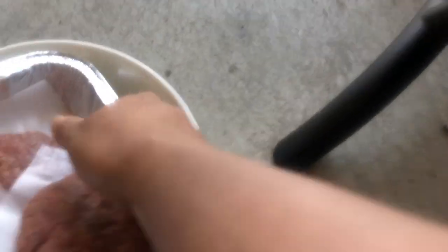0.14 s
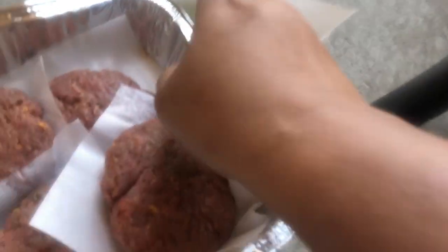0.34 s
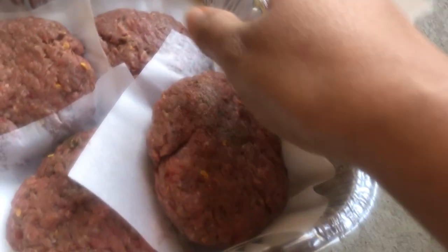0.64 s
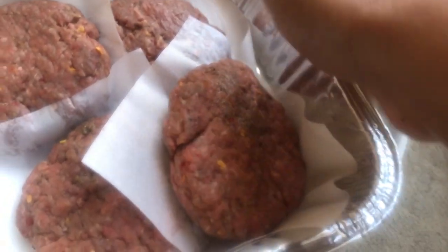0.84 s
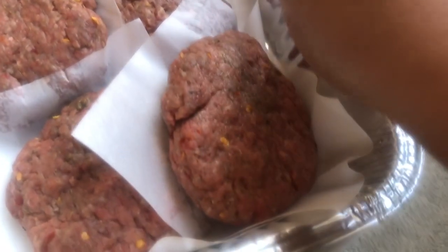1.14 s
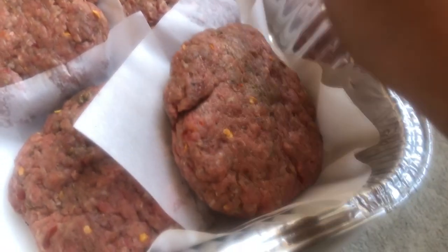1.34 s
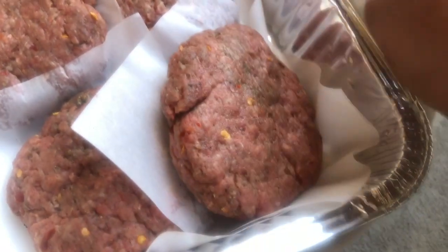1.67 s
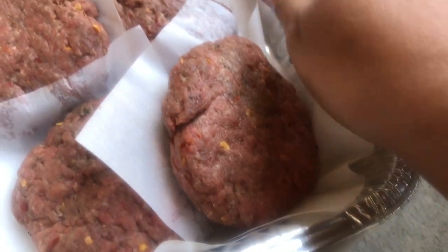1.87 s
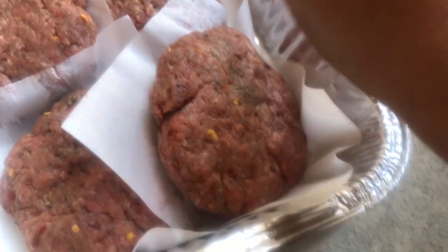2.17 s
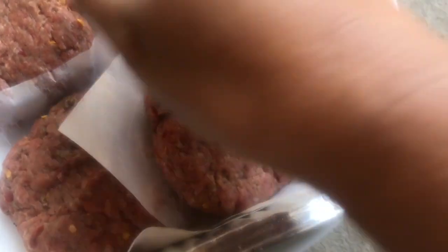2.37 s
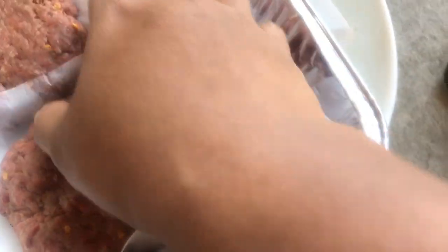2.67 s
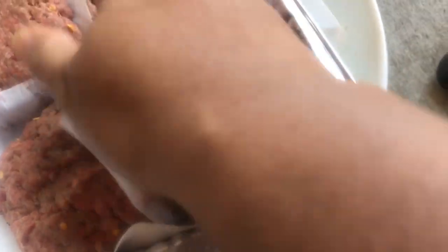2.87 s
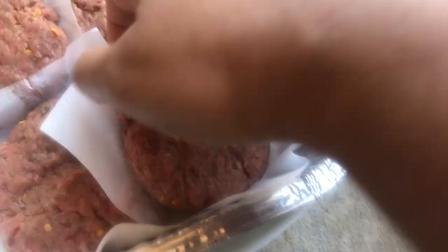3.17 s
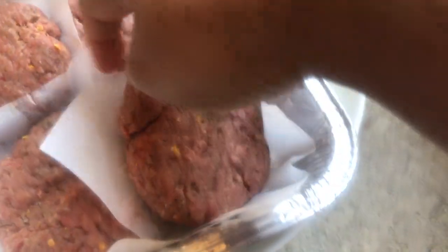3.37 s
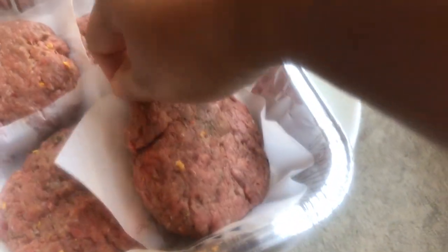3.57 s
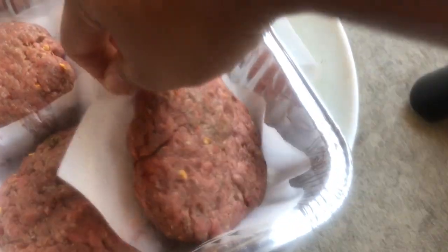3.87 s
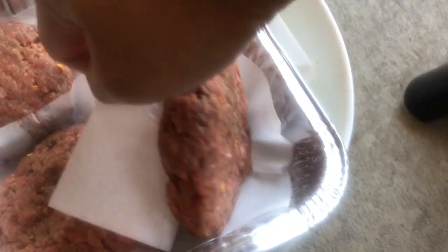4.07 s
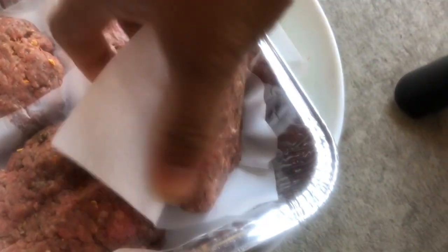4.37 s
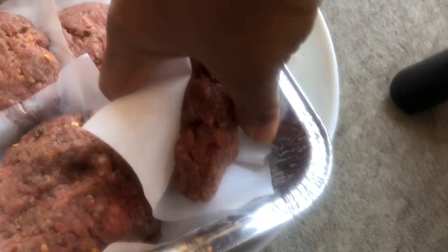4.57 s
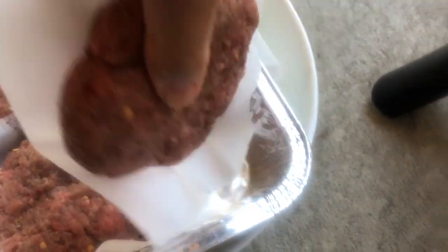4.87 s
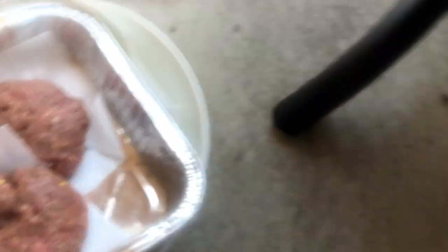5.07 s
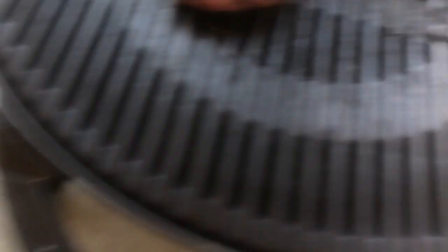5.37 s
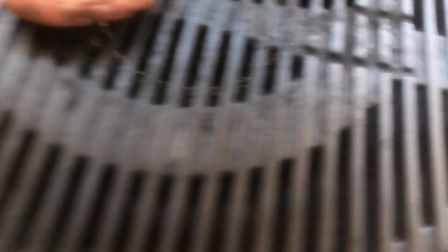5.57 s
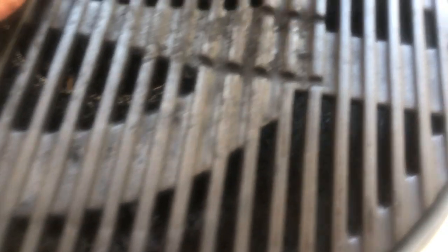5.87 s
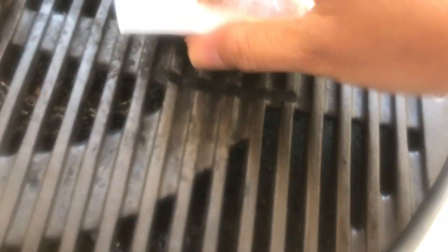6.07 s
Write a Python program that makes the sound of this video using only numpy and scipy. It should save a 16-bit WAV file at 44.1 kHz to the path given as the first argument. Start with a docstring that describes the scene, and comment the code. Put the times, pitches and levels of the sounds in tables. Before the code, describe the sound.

Meat sizzles on a grill while a foil tray and paper sheets are handled close by, crinkling, scraping and knocking.

```python
"""Outdoors at a grill, a hand-held phone microphone close beside the patties.
Steam bubbles burst in the fat: a sizzle heard from the side, then louder as the phone turns
to the grate, where single drops spit. Nearby a foil tray scrapes, rings and knocks as it is
shifted, and paper sheets rustle and snap. Near the end, water flashing to steam makes the fat
sputter in one burst. A low, distant rumble lies under it all."""
import sys
import numpy as np
from scipy import signal
from scipy.fft import rfft, irfft
from scipy.io import wavfile
from scipy.ndimage import uniform_filter1d

SR = 44100
rng = np.random.default_rng(int(sys.argv[2]) if len(sys.argv) > 2 else 0)


def unload_wav(signal):
    """Save mono or channel-first audio to the path in sys.argv[1] as 16-bit WAV at rate SR, clipped to [-1, 1]."""
    wavfile.write(
        sys.argv[1],
        SR,
        np.round(np.clip(np.atleast_2d(signal).T, -1, 1) * 32767).astype(np.int16),
    )


N = 274434
T = np.arange(N) / SR


def undb(db):
    """Gain of a level in dB."""
    return 10 ** (np.asarray(db) / 20)


def unit(x):
    """Scale to rms 1."""
    return x / np.sqrt(np.mean(x ** 2))


def gain(time_s, level_db):
    """Gain along a level curve, silent outside it."""
    return undb(np.interp(T, time_s, level_db, left=-120, right=-120))


def colour(x, spectrum):
    """Shape x to a (freq_hz, gain_db) spectrum, at rms 1."""
    freq_hz, gain_db = np.transpose(spectrum)
    bins_hz = np.fft.rfftfreq(2048, 1 / SR)
    curve_db = np.interp(np.log(bins_hz + 1), np.log(freq_hz), gain_db)
    cepstrum = irfft(curve_db * np.log(10) / 20)
    cepstrum[1:1024] *= 2  # folding the cepstrum makes the filter causal
    cepstrum[1025:] = 0
    impulse = irfft(np.exp(rfft(cepstrum)))
    return unit(signal.fftconvolve(x, impulse)[:N])


def band(x, hz, octaves):
    """Band-pass around hz."""
    edges = np.clip(hz * 2 ** np.array([-octaves / 2, octaves / 2]), [50, 100], [SR / 2.4, SR / 2.2])
    return signal.sosfilt(signal.butter(2, edges, "bandpass", fs=SR, output="sos"), x)


def low_shelf(x, hz, gain_db):
    """Raise or lower the part of x below hz."""
    low = signal.sosfiltfilt(signal.butter(2, hz, fs=SR, output="sos"), x)
    return x + (undb(gain_db) - 1) * low


def walk(rate_hz):
    """Smooth random drift at rms 1."""
    hold = int(SR / rate_hz)
    steps = np.repeat(rng.standard_normal(N // hold + 1), hold)
    return unit(uniform_filter1d(uniform_filter1d(steps, hold), hold)[:N])


def grains(per_s, spread_db):
    """Random clicks of either sign; a few are much larger than the rest."""
    clicks = (rng.random(N) < per_s / SR) * rng.standard_normal(N)
    return clicks * undb(spread_db * np.minimum(rng.exponential(size=N), 5))


def pitched_pops(per_band_s, spread_db, octaves):
    """Each size of bubble or crease rings briefly at its own pitch."""
    pitches_hz = 1000 * 2 ** np.arange(0, 4.1, .25)
    return unit(sum(unit(band(grains(per_band_s, spread_db), hz, octaves)) * np.sqrt(hz)
                    for hz in pitches_hz))


def burst(t60_s, rise_s=0.00028, crack_db=-40.):
    """Decaying noise with a quick rise, optionally led by a much shorter crack."""
    t = T[:4096]
    fall = np.exp(-np.log(1000) * t / max(t60_s, .002)) + undb(crack_db) * np.exp(-t / 0.00021)
    return rng.standard_normal(len(t)) * (1 - np.exp(-t / rise_s)) * fall


def add(out, start_s, sound, peak_db):
    """Mix a short sound in at the given peak level."""
    i = int(start_s * SR)
    out[i:i + len(sound)] += (sound * undb(peak_db) / np.abs(sound).max())[:N - i]


# Spectrum of the rumble, far from the microphone: freq_hz, gain_db
RUMBLE_COLOUR = [(15, -41), (25, -13.5), (103, -1), (134, -3.5), (179, -1), (365, -9), (389, -20),
                 (500, -10), (650, -40.5), (1100, -120)]
# Spectrum of the steady background around the grill: freq_hz, gain_db
AIR_COLOUR = [(200, -19.5), (400, 1), (700, -2.5), (1200, 0), (1700, -9), (2050, -6.5), (2600, -5),
              (2980, -18), (3300, -4), (4500, -6), (7000, -14)]


def outdoors():
    """Distant low noise wavers slightly under a steady mid-range background."""
    rumble_db = -56.5 + walk(8) + 0.16 * walk(1.14)
    rumble = undb(rumble_db) * colour(rng.standard_normal(N), RUMBLE_COLOUR)
    air = undb(-54.5) * colour(rng.standard_normal(N), AIR_COLOUR)
    return rumble + air


# Modes of the foil tray: pitch_hz, gain_db, t60_s
TRAY_MODES = [(290, -14, 0.039), (413, -5, 0.036), (563, 2.5, 0.024), (729, 2, 0.016), (999, 5.5, 0.016),
              (1224, 6.5, 0.0086), (1630, 3, 0.013), (2107, 5.5, 0.0037), (3470, -4, 0.012)]


def tray_ring(force, uneven_db=0.):
    """The tray's modes ring, alternating in sign; a moving contact point feeds them unevenly."""
    out = 0
    for k, (pitch_hz, gain_db, t60_s) in enumerate(TRAY_MODES):
        r = np.exp(-np.log(1000) / (t60_s * SR))
        w = 2 * np.pi * pitch_hz / SR
        feed = force * undb(uneven_db * walk(29.855)) if uneven_db else force
        mode = signal.lfilter([np.sin(w)], [1, -2 * r * np.cos(w), r * r], feed)
        out += (-1) ** k * undb(gain_db) * mode
    return out


# The hand in the tray near the microphone, one list per movement: time_s, tray_db, paper_db
HAND_MOVES = [
    [(0, -34.5, -34), (.036, -36, -35), (.075, -41.5, -28.5), (.114, -42, -46), (.19, -51.5, -46),
     (.27, -36, -44), (.32, -44.5, -45), (.355, -40, -53), (.48, -62, -61)],
    [(.59, -70, -58), (.603, -45, -46), (.64, -46.5, -53), (.72, -43.5, -36.5), (.75, -43, -40.5),
     (.8, -44, -44), (.84, -51, -49)],
    [(.84, -56, -60), (.862, -47, -39.5), (.934, -39.5, -41.5), (.985, -42.5, -46.5), (1.06, -39, -49.5),
     (1.09, -47, -48), (1.13, -60, -70)],
    [(1.44, -70, -62), (1.473, -46, -55), (1.55, -64, -60), (1.59, -49.5, -55), (1.67, -48, -46),
     (1.75, -46.5, -51.5), (1.81, -39.5, -40), (1.91, -43, -48.5), (1.94, -40, -44.5), (1.99, -63, -81)],
    [(2.005, -62, -60), (2.027, -46.5, -56), (2.05, -43, -41.5), (2.07, -45, -55), (2.11, -73, -72)],
    [(2.928, -61, -64), (2.945, -48, -59), (3.02, -52, -52), (3.08, -65, -56), (3.131, -47.5, -44),
     (3.16, -64, -56)],
    [(3.83, -60, -68), (3.917, -44, -49), (3.96, -43.5, -43), (4.02, -45.5, -41), (4.06, -40, -36),
     (4.145, -47.5, -43.5), (4.19, -48.5, -57), (4.22, -51, -59)],
    [(4.245, -55, -58), (4.3, -43.5, -49), (4.345, -54.5, -63), (4.392, -41.5, -50.5), (4.46, -58, -56),
     (4.53, -56, -54), (4.578, -44, -53), (4.64, -55, -52), (4.675, -70, -58)],
    [(4.68, -68, -64), (4.707, -46, -50), (4.771, -51, -42), (4.8, -52, -45), (4.88, -60, -57),
     (4.94, -77, -77)],
]
# The tray's low modes in each movement, weaker while it is held down: hollow_db
HOLLOW_DB = [0, -3, 5, -3, 2.5, 0, -3.5, -20, -30]


def handling():
    """Stick-slip friction rings the tray; creases in the paper give a brighter rustle."""
    slip = undb(1.5 * walk(80))
    clicks = unit(grains(per_s=700, spread_db=2.5))
    friction = slip * (rng.standard_normal(N) + undb(-0.5) * clicks)
    scrape = unit(tray_ring(friction, uneven_db=1.0))
    ticks = pitched_pops(per_band_s=120, spread_db=3., octaves=.35)
    creases = rng.standard_normal(N) + undb(-2.0) * ticks
    rustle = paper_rustle(creases)
    out = 0
    for move, hollow_db in zip(HAND_MOVES, HOLLOW_DB):
        time_s, tray_db, paper_db = np.transpose(move)
        out += gain(time_s, tray_db) * low_shelf(scrape, 700, hollow_db)
        out += gain(time_s, paper_db) * rustle
    return out


# Spectrum of the paper sheets at the microphone: freq_hz, gain_db
PAPER_COLOUR = [(800, 5), (1500, 2), (3000, 10.5), (5000, 8.5), (8000, 6.5), (12000, 1), (15000, -7),
                (16000, -27)]


def paper_rustle(creases):
    """Creasing paper sounds bright, and its level flutters fast."""
    flutter = undb(1.8 * walk(120))
    return colour(flutter * creases, PAPER_COLOUR)


# Dull knocks on the nearby tray: start_s, peak_db, centre_hz
TRAY_KNOCKS = [(0.253, -31, 990), (0.428, -37.5, 1030), (0.608, -36, 397), (0.855, -34, 972),
               (1.461, -39, 370), (1.584, -36.5, 684), (1.698, -33, 500), (1.902, -34, 630),
               (1.929, -25.5, 1090), (2.024, -52, 1140), (2.068, -35, 1170), (2.795, -40.5, 800),
               (3.138, -35.5, 820), (3.173, -40, 210), (3.224, -43, 217), (4.21, -39, 935),
               (4.478, -30.5, 845), (4.631, -37, 1840), (4.809, -40, 1140), (4.888, -40.5, 900),
               (5.469, -36, 484), (5.562, -39, 754), (5.935, -29, 2020)]


def knocks():
    """A soft thud briefly rings the tray."""
    out = np.zeros(N)
    for start_s, peak_db, centre_hz in TRAY_KNOCKS:
        thud = burst(t60_s=0.03, rise_s=0.00069)
        add(out, start_s, band(tray_ring(thud) + 22.0 * thud, centre_hz, octaves=1.27), peak_db)
    return out


# Foil and paper snapping near the microphone:
# start_s, peak_db, centre_hz, width_octaves, t60_s, knock_relative_db, knock_hz
CREASE_SNAPS = [(0.0306, -10.5, 4550, 3.8, 0.087, -17, 1370), (.07, -16, 4670, 3.6, 0.018, -26, 1970),
                (.093, -19.5, 7500, 2.3, 0.027, -18, 1020), (0.2662, -18, 5830, 0.99, 0.014, -20, 1660),
                (0.2814, -22.5, 6370, 2.7, 0.031, -12, 424), (0.3501, -15.5, 4540, 1.7, 0.014, -24, 657),
                (.3794, -30.5, 5570, 0.92, .014, -5, 1050), (0.4836, -24.5, 7840, 1.2, 0.0092, -21, 573),
                (0.62, -32, 2850, 0.44, 0.017, -0.5, 1130), (.6564, -31.5, 4440, 1.1, 0.019, -6, 575),
                (.7078, -24, 3120, 4.9, 0.035, -8, 1040), (.725, -19, 3500, 5.1, 0.0082, -12, 1140),
                (0.788, -21.5, 3650, 3.7, 0.015, -12, 1070), (0.8914, -27.5, 6420, 1.6, 0.025, -3, 1060),
                (0.918, -32, 5020, 1.4, 0.011, 2, 953), (.9368, -20, 3470, 2.2, .021, -8, 802),
                (.9506, -17.5, 3160, 2.6, .017, -26, 622), (1.06, -26.5, 2960, 3.3, 0.017, -12, 1210),
                (1.0826, -29.5, 3020, 1.7, 0.025, -3, 412), (1.8076, -28.5, 5360, 2.9, 0.042, -12, 587),
                (2.0374, -30, 13900, 2, 0.04, -12, 1120), (2.931, -30.5, 1600, 1.8, .008, 0, 600),
                (3.2991, -20, 7600, 3.8, 0.012, -42, 1310), (3.6281, -20, 5000, 0.31, 0.0037, -18.5, 1060),
                (3.65, -24, 4750, 1.05, 0.012, -24, 991), (3.8128, -29, 5000, .6, 0.0084, -20, 1050),
                (3.95, -28.5, 4350, .9, .012, -6.5, 810), (3.962, -30, 4620, 0.94, .0088, -7, 1760),
                (3.9926, -11, 5340, 1.4, .005, -18.5, 580), (4.0507, -10, 6800, 1.2, 0.0075, -16, 1900),
                (4.0601, -6.5, 3570, 3.8, 0.017, -14.5, 1150), (4.0846, -22, 4800, .75, 0.011, -22, 2050),
                (4.0918, -23, 5030, 0.84, 0.054, -5.5, 1360), (4.136, -14.5, 5350, 0.93, 0.0088, -8, 1420),
                (4.2611, -35, 2910, 1.1, 0.012, 4, 1000), (4.4723, -30, 4320, 2.3, 0.018, -10, 1240),
                (4.4799, -27, 6100, 4.7, 0.022, -7, 814), (4.486, -34, 6050, 2.3, .013, -2, 790),
                (4.544, -25, 2500, 2.7, 0.01, -.5, 1750), (4.7457, -26.5, 4510, 2.1, 0.014, -27, 1650),
                (4.7686, -24.5, 4650, 3.9, 0.036, -28, 1930)]


def snaps():
    """Each buckling crease is a crack with a short bright edge, and it knocks the tray."""
    out = np.zeros(N)
    for start_s, peak_db, centre_hz, width_octaves, t60_s, knock_relative_db, knock_hz in CREASE_SNAPS:
        crack = burst(t60_s, crack_db=7.5)
        add(out, start_s, band(crack, centre_hz, width_octaves), peak_db)
        edge = band(burst(0.63 * t60_s, crack_db=-9.0), hz=11500, octaves=0.23)
        add(out, start_s, edge, peak_db - 11)
        knock = band(tray_ring(crack) + 13.0 * burst(t60_s=0.052), knock_hz, octaves=1.2)
        add(out, start_s, knock, peak_db + knock_relative_db)
    return out


# Spurts of fat, microphone facing the grate: start_s, level_db, length_s
SPURTS = [(6.003, -24.5, 0.0047), (6.011, -16.5, 0.01), (6.021, -19.5, 0.011), (6.031, -16, 0.0032),
          (6.035, -26, 0.0083), (6.039, -38.5, 0.033), (6.059, -37, 0.0037), (6.066, -30.5, 0.018),
          (6.079, -35.5, 0.025)]
# Spectrum of the spurts: freq_hz, gain_db
SPUTTER_COLOUR = [(88, -19), (150, -9), (1040, -3), (1190, -10), (1790, -1.5), (3290, -3), (3770, -4.5),
                  (6770, -5.5), (16000, -7)]


def sputter():
    """Water flashes to steam in spurts: dense crackle that starts and stops short."""
    gate = sum(undb(level_db) * np.exp(-((T - start_s) / length_s) ** 4) * (T > start_s)
               for start_s, level_db, length_s in SPURTS)
    crackle = .7 * unit(grains(per_s=5000, spread_db=1.))
    return gate * colour(rng.standard_normal(N) + crackle, SPUTTER_COLOUR)


# The loudest spits, close to the grate: start_s, peak_db, centre_hz
FAT_SPITS = [(4.984, -21.5, 7700), (5.196, -21, 12400), (5.2523, -21.5, 7100), (5.2762, -25, 8140),
             (5.3024, -20, 14500), (5.355, -21, 13500), (5.3737, -22, 6710)]


def spits():
    """Single drops of fat burst with a short bright crack."""
    out = np.zeros(N)
    for start_s, peak_db, centre_hz in FAT_SPITS:
        crack = burst(t60_s=0.0079, crack_db=0.0)
        add(out, start_s, band(crack, centre_hz, octaves=0.74), peak_db)
    return out


# Loudness curve of the frying at the microphone: time_s, level_db
SIZZLE_LEVELS = [(0.0, -29), (0.08, -35), (0.47, -39.5), (0.81, -45.5), (1.7, -44), (2.81, -40.5),
                 (3.19, -44), (4.78, -45), (5.01, -33), (5.15, -33), (5.92, -31.5), (6.22, -28.5)]
# Spectrum of the frying, microphone facing the grate: freq_hz, gain_db
FACING_COLOUR = [(240, -40), (400, -9), (496, -7), (852, -13), (949, -16), (1040, -13.5), (1490, -11),
                 (2630, -12.5), (3370, -5), (5000, -4), (6150, 0), (10000, -2), (15000, 0), (16000, 1)]
# Spectrum of the frying, heard from the side: freq_hz, gain_db
SIDE_COLOUR = [(1200, -27), (2000, -4.5), (2400, -11), (2700, -8.5), (2980, -8), (3300, -9.5), (4300, -4.5),
               (6100, -2), (7100, -2), (11700, -5), (15200, -1.5), (16000, -0.5)]
TURN_START_S, TURN_END_S = 4.94, 5.48  # the phone swings round to the grate
SHADE_S, SHADE_DB = [4.6, 4.96, 5.29], [-3, -11, 0.1]  # the lower hiss lags the treble as the grate nears
ECHO_S, ECHO_DRIFT_S, ECHO_DB = 0.000593, .00003, -18.5  # floor reflection, shifting as the phone moves


def sizzle():
    """Thousands of steam bubbles burst in the fat: hiss, pitched pops and a few dry spits."""
    spit_tail = rng.standard_normal(128) * np.exp(-T[:128] / .00008)
    dry_spits = unit(signal.fftconvolve(grains(per_s=220, spread_db=1.7), spit_tail)[:N])
    pops = pitched_pops(per_band_s=150, spread_db=2.6, octaves=.15)
    fry = rng.standard_normal(N) + undb(-11) * pops + undb(-12) * dry_spits
    facing = np.interp(T, [TURN_START_S, TURN_END_S], [0, 1])
    at_mic = facing * colour(fry, FACING_COLOUR) + (1 - facing) * colour(fry, SIDE_COLOUR)
    at_mic = low_shelf(at_mic, 5000, np.interp(T, SHADE_S, SHADE_DB))
    delay_s = ECHO_S + ECHO_DRIFT_S * walk(2.044)
    at_mic += undb(ECHO_DB) * np.interp(T - delay_s, T, at_mic)
    waver = undb(.7 * walk(40) + .4 * walk(6))
    return at_mic * gain(*np.transpose(SIZZLE_LEVELS)) * waver


def scene():
    """One microphone beside the grill feeds both channels."""
    mono = sizzle() + spits() + handling() + snaps() + knocks() + sputter() + outdoors()
    return np.tile(mono, (2, 1))


def record(dry):
    """The phone drops the bass below 45 Hz and cuts the top above 15.7 kHz."""
    bass_cut = signal.butter(3, 45, "highpass", fs=SR, output="sos")
    top_cut = signal.ellip(14, .2, 70, 15700, fs=SR, output="sos")
    return signal.sosfilt(top_cut, signal.sosfilt(bass_cut, dry))


dry = scene()
out = record(dry)
unload_wav(out)
```